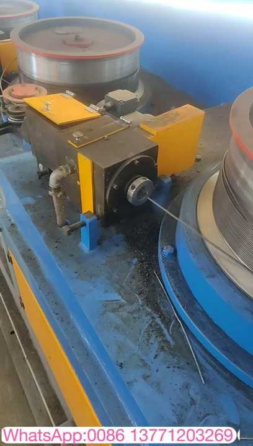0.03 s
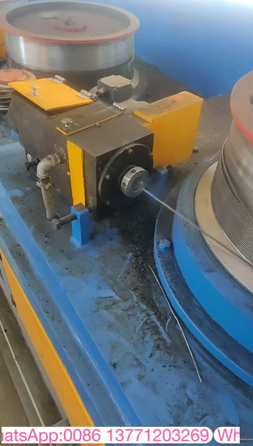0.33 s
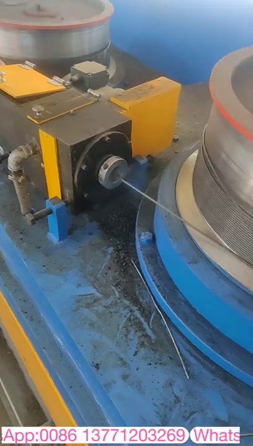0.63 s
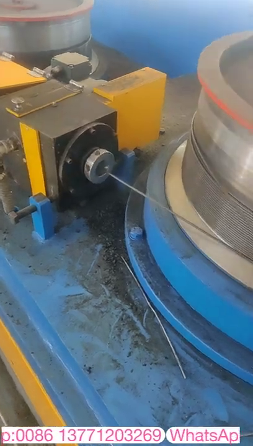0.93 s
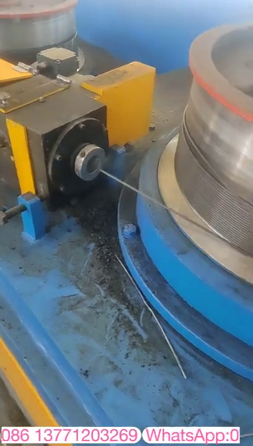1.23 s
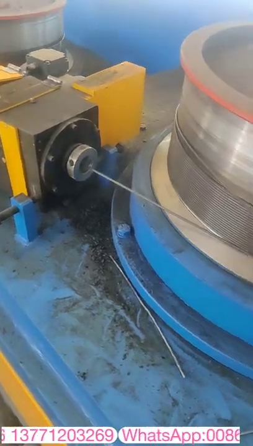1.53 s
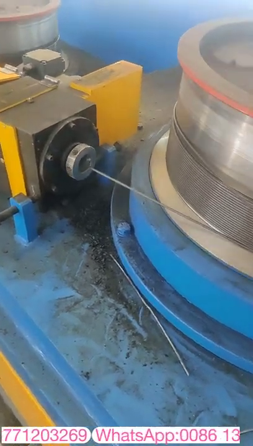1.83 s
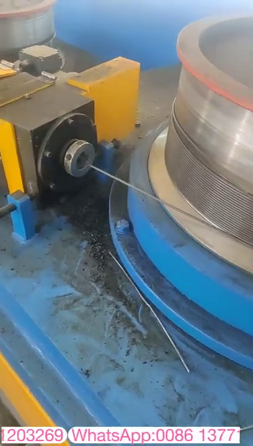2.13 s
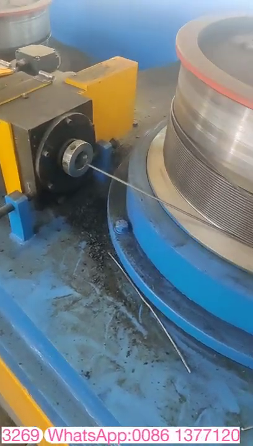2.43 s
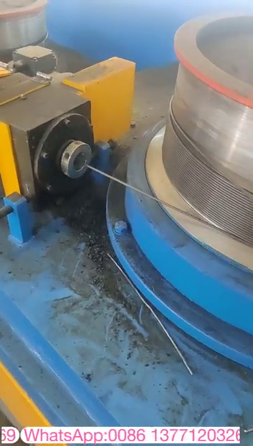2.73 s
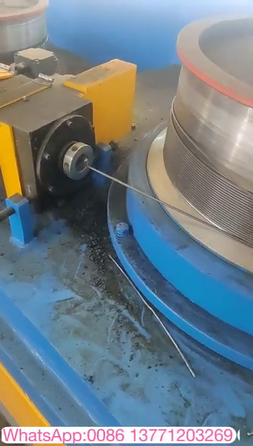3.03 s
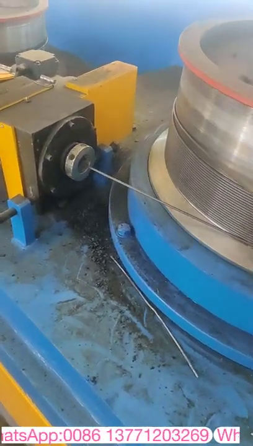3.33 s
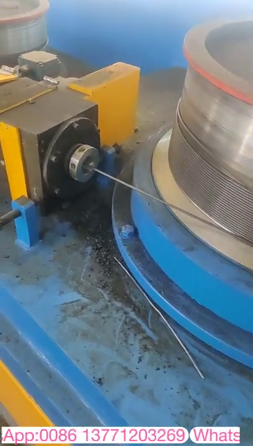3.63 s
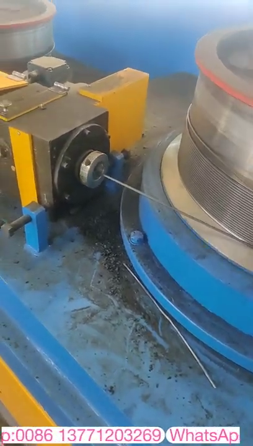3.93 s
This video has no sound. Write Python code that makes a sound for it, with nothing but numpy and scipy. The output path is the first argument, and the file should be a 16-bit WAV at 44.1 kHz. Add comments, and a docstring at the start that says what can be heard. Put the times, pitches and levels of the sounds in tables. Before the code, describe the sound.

A wire drawing machine cuts in at about 0.2 seconds and reaches full level by 0.5, close by in a factory hall. Its high, wavering motor whine holds to the end over gear hum, a low roar and hissing wire. Tiny squeaks come near 1, 2.3 and 3.6 seconds, and one brief scrape at 2.5. A thin gear whistle grows from around 1.5 seconds.

```python
"""A whining cluster of beating tones cuts in and fades up quickly, over gear hum and a low roar.
It is a wire drawing machine in a factory hall, heard from beside a die box and its capstan.
Inverter-fed motors make the whine, shafts and meshing teeth the hum. Sliding friction makes
the wire hiss through the die and onto the drum, with a few tiny squeaks and one scrape."""
import sys
import numpy as np
from scipy import signal
from scipy.fft import rfft, irfft
from scipy.io import wavfile
from scipy.ndimage import uniform_filter1d

SR = 44100
rng = np.random.default_rng(int(sys.argv[2]) if len(sys.argv) > 2 else 0)


def dump_mix(stems):
    """Bounce the given channels to the path in sys.argv[1] as a 16-bit WAV at rate SR."""
    frames = np.atleast_2d(stems).T  # one column per channel
    limited = np.clip(frames, -1, 1)  # hard clip at full scale
    pcm = np.round(limited * 32767).astype(np.int16)
    wavfile.write(sys.argv[1], SR, pcm)


N = 176400
TIME = np.arange(N) / SR
CONTROL_HZ = 200
SLOW_TIME = np.arange(1024) / CONTROL_HZ
SIDES = np.array([[1], [-1]])  # left, right


def amp(db):
    return 10 ** (np.asarray(db) / 20)


def unit(x):
    return x / np.sqrt(np.mean(abs(x) ** 2) + 1e-20)


def at_time(points, t):
    return np.interp(t, *np.transpose(points))


def at_freq(points, hz):
    f, value = np.transpose(points)
    return np.interp(np.log(hz + 1), np.log(f + 1), value)


def swell(age):
    """Critically damped envelope: rises to 1 at age 1, then dies away."""
    return age * np.exp(1 - age)


def wander(rate_hz):
    """Random modulation: low-passed complex noise of unit power, at the control rate."""
    real, imag = rng.standard_normal((2, len(SLOW_TIME)))
    f = np.fft.fftfreq(len(SLOW_TIME), 1 / CONTROL_HZ)
    return unit(np.fft.ifft((real + 1j * imag) * np.exp(-.5 * (f / rate_hz) ** 2)))


# Likeness of the sound at the two ears: frequency_hz, coherence
COHERENCE = [(30, 0.97), (130, 1), (210, 0.91), (280, 0.71), (370, .82), (660, 0.22), (820, 0.39),
             (1100, -0.069), (2500, -0.058), (5000, -0.11), (15000, 0.032)]

def tone(hz, pan_db, scatter, rate_hz, flutter=.33, spread=.81):
    """Interference of a fluttering tone with shifting reflections; short waves differ between ears."""
    centre_hz = np.mean(hz)
    coherence = np.clip(at_freq(COHERENCE, centre_hz), 0, 1)
    direct = np.exp(1j * SIDES * spread * (1 - coherence) * rng.choice([-1, 1]))
    echoes = np.sqrt(coherence) * wander(rate_hz)
    echoes = echoes + np.sqrt(1 - coherence) * np.array([wander(rate_hz), wander(rate_hz)])
    drift_cycles = np.cumsum((hz - centre_hz) * np.ones(len(SLOW_TIME))) / CONTROL_HZ
    drift = np.exp(2j * np.pi * (drift_cycles + rng.random()))
    ears = amp(SIDES * pan_db / 2) * (np.sqrt(1 - scatter ** 2) * direct + scatter * echoes)
    ears = np.sqrt(2) * unit(ears * drift * (1 + flutter * wander(rate_hz=33)))
    carrier = np.exp(2j * np.pi * centre_hz * TIME)
    return np.array([(np.interp(TIME, SLOW_TIME, ear) * carrier).real for ear in ears])


# One motor per drawing block: supply_hz, level_db
MOTORS = [(59.0, -30), (57.3, -33.5), (52.5, -39.5), (50.0, -34.5), (48.7, -41), (62.3, -46)]
# Tones on both sides of the switching carrier: supply_multiple, gain_db
SIDEBANDS = [(1, -3.8), (3, 0), (5, -10.5)]
# Sideband balance as the listener moves: time_s, upper_minus_lower_db
WHINE_TILT = [(.3, 1.5), (.5, 4), (.8, 1.5), (1.08, 5), (1.4, -.5), (2.55, -1.5), (3.2, 1.5), (4, .5)]

def motor_whine(carrier_hz=4000.2):
    """Modulation sidebands: each motor sings at the carrier plus and minus odd supply multiples."""
    supplies = [(hz * (1 + .002 * wander(rate_hz=.98).real), db) for hz, db in MOTORS]
    out = np.zeros((2, N))
    for sign in (1, -1):
        tilt = amp(sign * at_time(WHINE_TILT, TIME) / 2)
        for supply_hz, level_db in supplies:
            for multiple, gain_db in SIDEBANDS:
                hz = carrier_hz + sign * multiple * supply_hz
                out += tilt * amp(level_db + gain_db) * tone(hz, pan_db=6, scatter=.42, rate_hz=3.6)
    return out


# Shaft and gear tones: pitch_hz, relative_level_db, left_minus_right_db
GEAR_TONES = [(56, -31, -1), (84, -31, -1), (113, -28, -2), (169, -27, -4), (203, -25, 0), (212, -28, 0),
              (229, -27, -2), (351, -31, 0), (545, -32, -5), (639, -36, 3), (720, -39, 1), (807, -36, -3),
              (903, -38, 2), (984, -38, -6), (1090, -39, -15), (1254, -38, 0), (1286, -36, -4),
              (1895, -42, 2), (2595, -43, -4), (2725, -48, 7), (5110, -48, 1), (5402, -49, -14),
              (5464, -48, -14)]
# A gear whistle that grows as the capstan comes near: time_s, level_db
WHISTLE_LEVEL = [(.3, -46), (1.3, -43), (1.8, -39), (2.6, -36.5), (3.05, -41.5), (3.25, -36.5), (4, -34.5)]

def gear_hum():
    """Periodic forcing: shafts and meshing teeth hum, and one mesh whistles."""
    hum = sum(amp(db) * tone(hz, pan_db, scatter=.59, rate_hz=2.22, flutter=.11, spread=.73)
              for hz, db, pan_db in GEAR_TONES)
    whistle = tone(hz=2690, pan_db=1.5, scatter=.35, rate_hz=4, flutter=.15, spread=.3)
    return amp(.9) * hum + amp(at_time(WHISTLE_LEVEL, TIME)) * whistle


# The wire's hiss, swelling as the drum turns: time_s, relative_level_db
HISS_LEVEL = [(.5, -31.5), (.78, -31.8), (.98, -30.2), (1.45, -31.8), (1.96, -30.8), (2.08, -33.3),
              (2.22, -31.2), (2.29, -32.5), (2.36, -31), (2.6, -31.5), (2.77, -34), (2.9, -32),
              (2.99, -33.3), (3.12, -30.2), (3.27, -31.7), (3.37, -30.6), (3.56, -33.5), (3.66, -31),
              (3.84, -29.8), (4, -30.5)]
# Rasp in the upper midrange: time_s, gain_db
RASP_GAIN = [(.3, 0), (.6, 2), (.8, 0), (1.3, .3), (2.1, -.8), (2.8, -.3), (3.15, .3), (3.35, 3),
             (3.6, -.5), (3.92, 2.2)]
HISS_FROM_HZ = 3800

def friction_noise(rasp_hz=2060, reference_db=-31.6):
    """Sliding friction: two independent noises whose treble swells and flickers together."""
    frames, hz = N // 256 + 5, np.fft.rfftfreq(1024, 1 / SR)
    t = np.arange(frames)[:, None] * 256 / SR
    a, b, c, d, patches = rng.standard_normal((5, frames, 513))
    white = np.array([a + 1j * b, c + 1j * d])
    patches = unit(uniform_filter1d(uniform_filter1d(patches, size=9, axis=0), size=22, axis=1))
    flicker = unit(uniform_filter1d(rng.standard_normal((frames, 1)), size=8, axis=0))
    treble = 1 / (1 + (HISS_FROM_HZ / (hz + 1)) ** 4)
    hiss_band = treble + .35 * (1 - treble) * hz / (hz + 600)  # the midrange follows in part
    hiss_db = hiss_band * (at_time(HISS_LEVEL, t) - reference_db + .5 * flicker)
    rasp_db = np.exp(-np.log2((hz + 1) / rasp_hz) ** 2) * at_time(RASP_GAIN, t)
    spectra = white * amp(hiss_db + rasp_db + .9 * patches)
    return signal.istft(spectra.swapaxes(1, 2), nperseg=1024, noverlap=768)[1][:, :N]


# Noise spectrum of the line and the hall: frequency_hz, relative_density_db
ROAR_SPECTRUM = [(12, -11), (28, 1), (55, 3), (110, 4.5), (165, 5), (210, 5.5), (330, 2.4), (440, 1.84),
                 (510, -3.5), (860, -4), (1030, -9), (1330, -8), (1700, -13.5), (2300, -14), (2600, -15.5),
                 (2740, -11), (2900, -19), (3350, -15), (3600, -19.5), (4050, -20.5), (4500, -19.5),
                 (5200, -17.5), (6000, -23), (7400, -20.5), (9000, -26.5), (10300, -23.5), (15300, -24)]
# Level difference between the ears: frequency_hz, left_minus_right_db
EAR_BALANCE = [(50, -0.5), (450, -1.5), (620, 5.5), (850, -2), (1100, -2), (1450, -4), (2000, -0.5),
               (2900, -0.5), (3400, 7.5), (4600, 7.5), (5400, -1), (7000, -2.5), (15000, 2.5)]
# Phase difference between the ears: frequency_hz, left_lead_rad
EAR_PHASE = [(30, .02), (170, 0.3), (260, 0), (450, 0.33), (650, 0.7), (800, 0), (15000, 0.18)]

def roar_and_hiss(buzz_hz=220):
    """Source and filter: housings and hall colour the line's rumble and the wire's hiss."""
    f = np.fft.rfftfreq(N, 1 / SR)
    shared, separate = rfft(friction_noise())
    coherence = at_freq(COHERENCE, f)
    left = shared * np.exp(1j * at_freq(EAR_PHASE, f))
    right = coherence * shared + np.sqrt(1 - coherence ** 2) * separate
    resonances_db = 1.7 * unit(uniform_filter1d(rng.standard_normal(len(f)), size=70)) * f / (f + 300)
    colour_db = resonances_db + at_freq(ROAR_SPECTRUM, f) + SIDES / 2 * at_freq(EAR_BALANCE, f)
    spectrum = np.array([left, right]) * amp(colour_db) * (f < 16060)
    hiss = irfft(spectrum * (f > HISS_FROM_HZ), N)
    buzz = .07 * np.sin(2 * np.pi * buzz_hz * TIME) * hiss
    return amp(-13.3) * unit(irfft(spectrum, N) + buzz)


# Slips of the wire as it settles on the drum: start_s, pitch_hz, level_db
SQUEAKS = [(.9, 13180, -28), (.98, 13180, -27), (1.021, 13200, -29), (2.21, 10450, -36),
           (2.338, 10450, -33), (3.6, 10400, -35)]

def wire_squeaks(rise_s=.011, width_hz=200):
    """Resonance: each short slip rings one narrow, very high band."""
    pole = np.exp(-np.pi * width_hz / SR)
    out = np.zeros((2, N))
    for start_s, pitch_hz, level_db in SQUEAKS:
        age = np.maximum(TIME - start_s, 0)
        slow_noise = signal.lfilter([1], np.poly([pole, pole]), rng.standard_normal((2, N)))
        ring = slow_noise * np.cos(2 * np.pi * pitch_hz * TIME)
        out += amp(level_db) * swell(age / rise_s) * unit(ring)
    return out


# Friction spectrum of a turn of wire scraping the drum: frequency_hz, relative_density_db
SCRAPE_SPECTRUM = [(100, -30), (1000, -5), (2000, -1), (4000, -5), (6500, 9), (9000, 3), (15000, 3),
                   (17000, -30)]

def drum_scrape(start_s=2.469, rush_rise_s=.026, ring_rise_s=.045):
    """Modal excitation: a brief rush of friction, with one mode of the drum swelling behind it."""
    age = np.maximum(TIME - start_s, 0)
    colour = amp(at_freq(SCRAPE_SPECTRUM, np.fft.rfftfreq(N, 1 / SR)))
    rush = unit(irfft(rfft(rng.standard_normal((2, N))) * colour, N))
    ring = tone(hz=5410, pan_db=-11, scatter=.8, rate_hz=29)
    return amp(-23.5) * swell(age / rush_rise_s) * rush + amp(-31) * swell(age / ring_rise_s) * ring


def scene():
    """Superposition: the running machine and the wire's brief sounds add at each ear."""
    return motor_whine() + gear_hum() + roar_and_hiss() + drum_scrape() + wire_squeaks()


# The opening fade: time_s, gain_db
FADE_IN = [(.236, -13.5), (.26, -10), (.3, -7.5), (.4, -3), (.48, -.2)]

def record(dry, start_s=.2355, bass_in_s=.34, bass_hz=111, knee=.7, cutoff_hz=15560):
    """Gain and saturation: the sound fades up, bass last, then is soft-clipped and band-limited."""
    bass = signal.sosfiltfilt(signal.butter(2, bass_hz, fs=SR, output="sos"), dry)
    bass_cut = np.clip((bass_in_s - TIME) / .027 + .5, 0, .85)
    faded = (dry - bass_cut * bass) * amp(at_time(FADE_IN, TIME)) * (TIME > start_s)
    linear, headroom = np.clip(faded, -knee, knee), .97 - knee
    limited = linear + headroom * np.tanh((faded - linear) / headroom)
    lowpass = signal.firwin(801, cutoff_hz, window=("kaiser", 9), fs=SR)
    return signal.oaconvolve(limited, lowpass[None], "same")


dry = scene()
out = record(dry)
dump_mix(out)
```